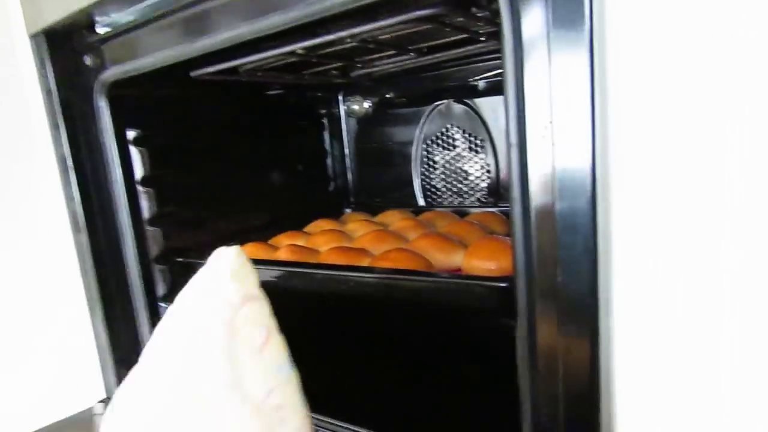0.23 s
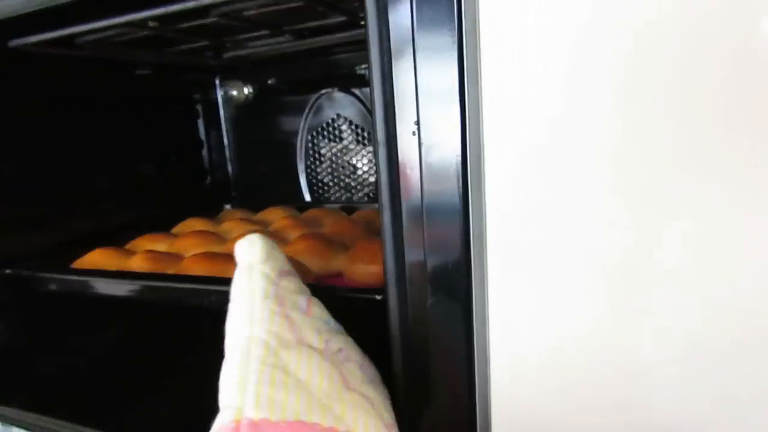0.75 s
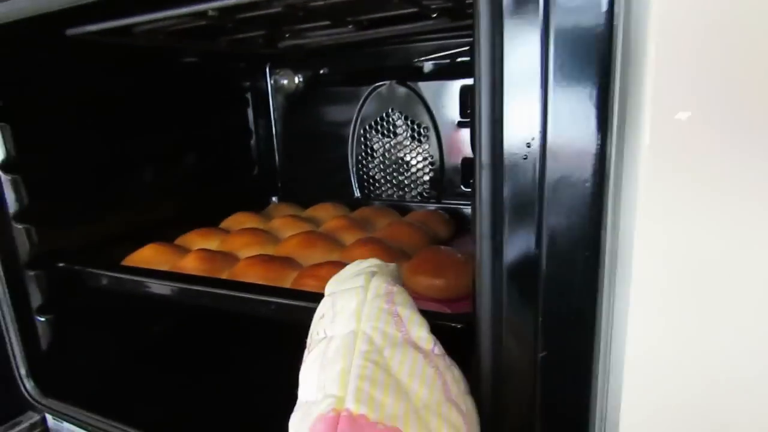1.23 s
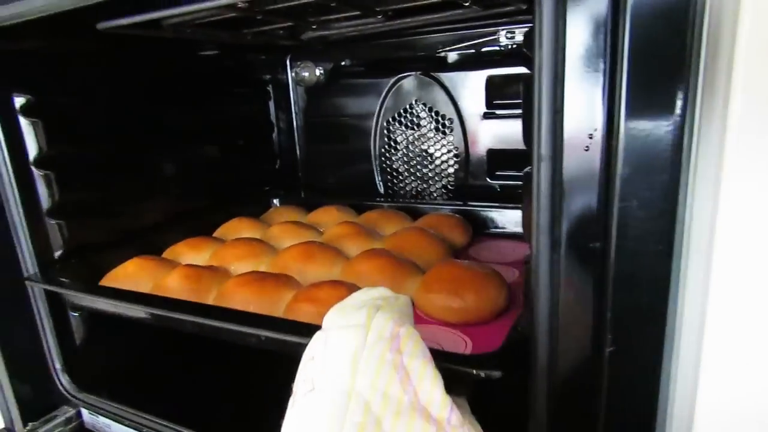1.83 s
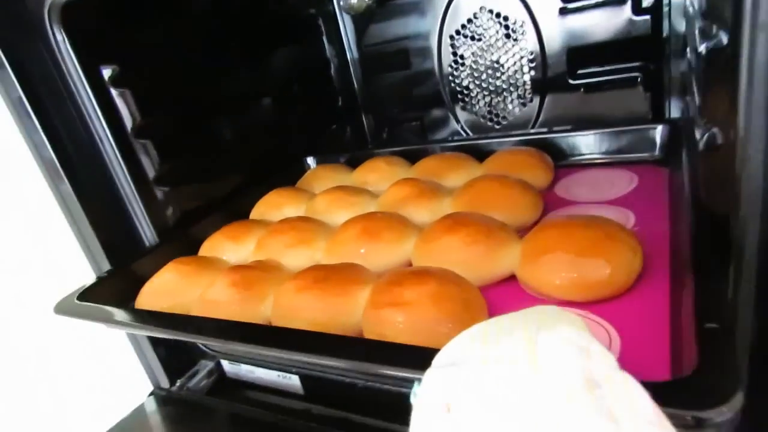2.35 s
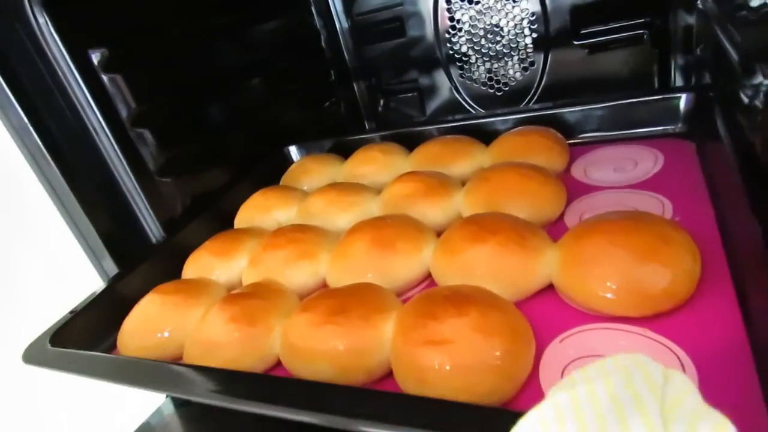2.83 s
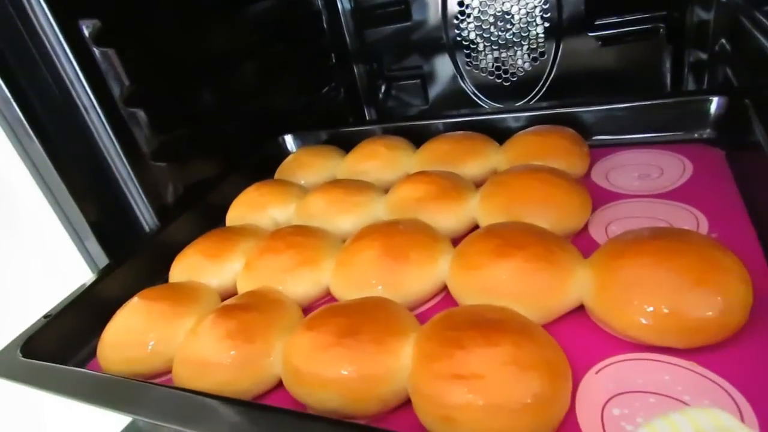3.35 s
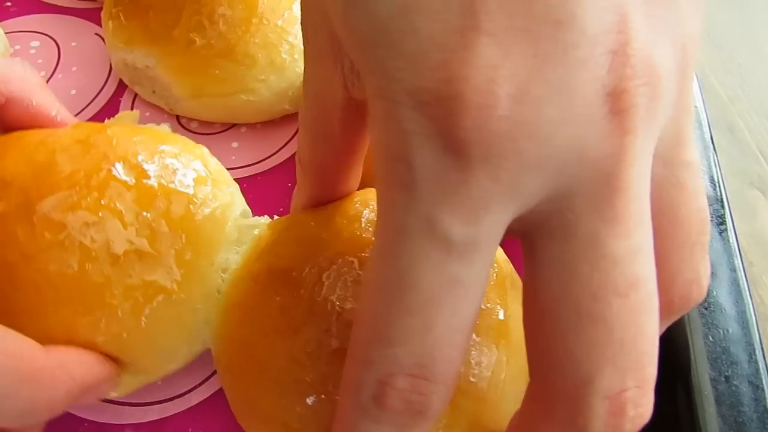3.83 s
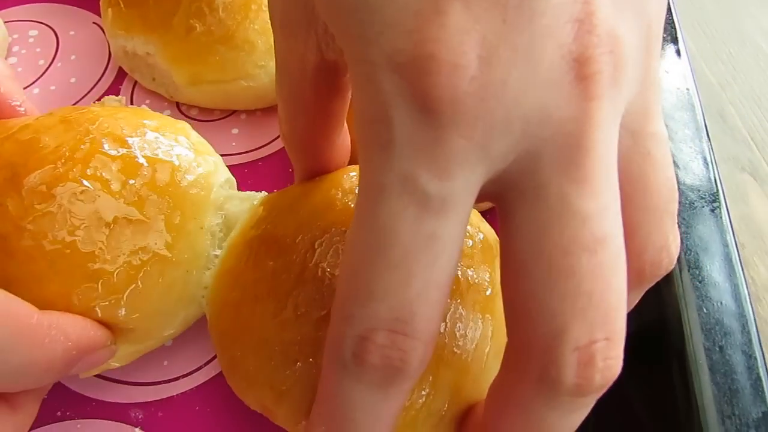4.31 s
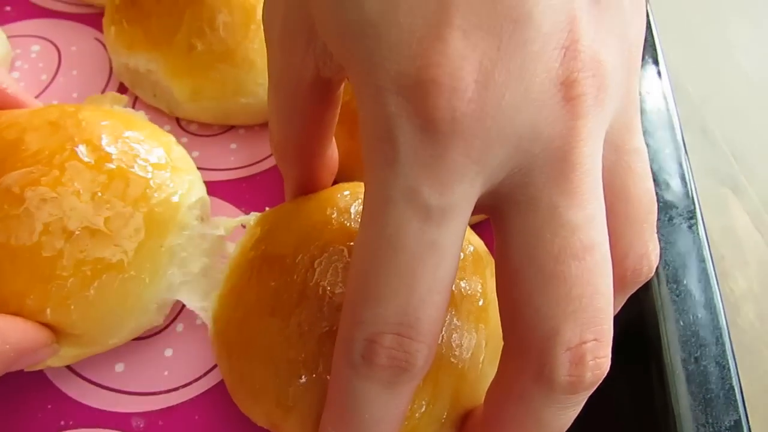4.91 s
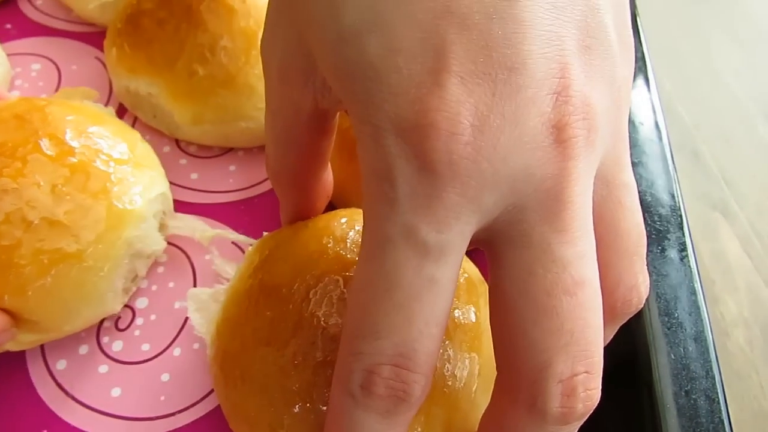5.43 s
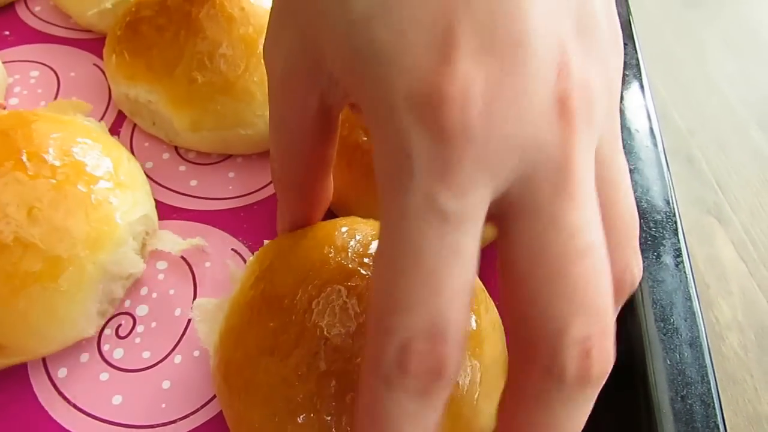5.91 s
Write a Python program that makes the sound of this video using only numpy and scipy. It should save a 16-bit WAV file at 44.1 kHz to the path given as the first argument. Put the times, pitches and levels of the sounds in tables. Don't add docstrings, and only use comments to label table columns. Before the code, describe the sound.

A metal baking tray is bumped, scraped out along oven rails and knocks to a stop amid hot steel ticks, then birds chirp faintly outside.

```python
import sys
import numpy as np
from scipy import signal
from scipy.fft import rfft, irfft, next_fast_len
from scipy.io import wavfile
from scipy.ndimage import map_coordinates

SR = 44100
rng = np.random.default_rng(int(sys.argv[2]) if len(sys.argv) > 2 else 0)


def materialize(psi):
    bounded = np.clip(np.atleast_2d(psi).T, -1, 1)
    quanta = np.round(bounded * 32767).astype(np.int16)
    wavfile.write(sys.argv[1], SR, quanta)


def magnitude_from_level(level_db):
    exponent = np.asarray(level_db, float) / 20
    return 10 ** exponent


N = 272097
CUT_S = 3.675


def unit(x):
    return x / np.sqrt(np.mean(x ** 2) + 1e-20)


def along(points, hz):
    f, v = np.transpose(points)
    return np.interp(np.log(hz + 1), np.log(f + 1), v)


def curves(rows):
    s, *cols = np.transpose(rows)
    return [np.interp(np.arange(N) / SR, s, c) for c in cols]


def during(t0, t1, fade):
    t = np.arange(N) / SR
    return np.clip((t - t0) / fade, 0, 1) * np.clip((t1 - t) / fade, 0, 1)


def wobble(rate, size=N):
    knots = rng.standard_normal(int(size * rate / SR) + 4)
    return map_coordinates(knots, [np.arange(size) * rate / SR])


def filtered(x, response):
    m = next_fast_len(x.shape[-1] + 4096)
    return irfft(rfft(x, m) * response(np.fft.rfftfreq(m, 1 / SR)), m)[..., :x.shape[-1]]


def coloured(points):
    return lambda hz: magnitude_from_level(along(points, hz))


def peaks(modes):
    def response(f):
        total = 0
        for k, (centre, width, db) in enumerate(modes):
            damping = 1j * f * width
            total = total + (-1) ** k * magnitude_from_level(db) * damping / (centre ** 2 - f * f + damping)
        return total
    return response


def pair(colour, side_db, size=N):
    def split(hz):
        turn = np.arctan(magnitude_from_level(along(side_db, hz)))
        return colour(hz) * [np.cos(turn), np.sin(turn)]
    mid, side = filtered(rng.standard_normal((2, size)), split)
    return unit(np.array([mid + side, mid - side]))


def dying(t60_of, width, size):
    hz, t, z = signal.stft(pair(np.ones_like, width, size=size), SR, nperseg=128)
    decay = magnitude_from_level(-60 * t / t60_of(hz)[:, None])
    return signal.istft(z * decay, SR, nperseg=128)[1][:, :size]


def add(track, s, sound):
    part = track[:, round(s * SR):][:, :sound.shape[1]]
    part += sound[:, :part.shape[1]]


# f/Hz, level/dB per Hz
QUIET = [(8.8, -30), (15, 4.5), (40, -11), (118, -20), (274, -34.5), (519, -35.5), (618, -36.5),
         (1440, -43), (2290, -39.5), (2490, -36.5), (2720, -45.5), (3750, -41), (6320, -49), (9220, -48.5),
         (15600, -53)]
# f/Hz, side minus mid level/dB
QUIET_ALIKE = [(60, -11), (130, -1.5), (290, -2), (640, 0.5), (1410, 1), (3100, 2.5), (6820, 0.5),
               (15000, -20)]


def kitchen():
    return magnitude_from_level(-60) * pair(coloured(QUIET), QUIET_ALIKE)


# t/s, level/dB
LOW_FLOCK = [(3.659, -78), (4.1, -91), (4.6, -96.5), (5.8, -86), (6.17, -88.5)]
# t/s, level/dB
HIGH_FLOCK = [(4.55, -100), (4.8, -88.5), (5.7, -91), (6.17, -101)]


def flock():
    out = np.zeros(N)
    ranges_hz = ([2100, 2500, 3100, 3500, 3900, 4300], [6500, 7100, 7700])
    for db, centres_hz in zip(curves(LOW_FLOCK) + curves(HIGH_FLOCK), ranges_hz):
        for hz in centres_hz:
            pitch = hz * (1 + .05 * wobble(25) + .02 * wobble(120))
            tone = np.sin(2 * np.pi * np.cumsum(pitch) / SR)
            out += magnitude_from_level(db) * unit(magnitude_from_level(5 * wobble(22))) * tone
    return out


# t/s, length/s, starting f/Hz, level/dB
CHIRPS = [(3.68, .05, 3300, -82), (3.92, .08, 4700, -75), (4.22, .04, 4300, -79), (4.25, .03, 3350, -79),
          (4.44, .04, 4450, -78), (4.46, .03, 3350, -78), (5.28, .05, 3150, -78), (5.4, .06, 3700, -75),
          (5.53, .05, 3800, -79), (5.58, .03, 3150, -79), (5.67, .06, 3700, -76), (5.9, .04, 4400, -84)]
WHISTLES = [(3.8, .2, 1890, -84), (4.0, .155, 2280, -73), (4.34, .07, 1690, -85), (4.76, .19, 1880, -79),
            (4.79, .2, 4030, -83), (4.96, .13, 3990, -76), (5.09, .14, 4000, -82), (5.93, .14, 3200, -86),
            (5.33, .13, 2630, -76), (5.96, .16, 2070, -84)]
WARBLES = [(3.66, .13, 2040, -76), (3.66, .08, 4400, -80), (3.72, .08, 3960, -75), (4.47, .15, 1970, -73),
           (5.07, .2, 2040, -77), (5.25, .12, 2160, -82), (5.24, .07, 3620, -81), (5.63, .25, 2020, -83)]
RISERS = [(4.42, .08, 1780, -83), (5.02, .06, 6600, -85), (5.42, .07, 5080, -82), (5.47, .06, 6750, -89),
          (5.87, .08, 2100, -82), (6.04, .06, 5180, -88)]
COOS = [(3.9, .65, 490, -83), (5.93, .24, 545, -85)]
HOOT = [(5.44, .14, 725, -71)]
STROKES = [(s + lag, .9 * length, hz, db + 1) for s, length, hz, db in CHIRPS for lag in (0, .022)]
# notes, glide/(share of pitch per s), smear f/Hz
SINGERS = [(STROKES, -5.5, 110), (WHISTLES, -.07, 14), (WARBLES, -.12, 70),
           (RISERS, .7, 110), (COOS, .01, 16), (HOOT, -.6, 3)]
# f/Hz, time to fall 60 dB/s
YARD = [(300, 0.41), (8000, 0.2)]


def birds():
    dry = flock()[None]
    for notes, glide, smear_hz in SINGERS:
        for s, length, hz, db in notes:
            u = np.linspace(0, 1, round(length * SR))
            pitch = hz * (1 + glide * length * u ** .7) + smear_hz * wobble(130, size=len(u))
            swell = np.clip(np.minimum(u, 1 - u) * length / 0.012, 0, 1)
            swell = swell * magnitude_from_level(1.3 * wobble(14, size=len(u)) - 4.3 * u)
            note = swell * np.sin(2 * np.pi * np.cumsum(pitch) / SR)
            add(dry, s, magnitude_from_level(db + 6.5) * note[None])
    hz, t, z = signal.stft(rng.standard_normal((2, SR // 2)), SR, nperseg=256)
    tail = signal.istft(z * magnitude_from_level(-60 * t / along(YARD, hz)[:, None]), SR, nperseg=256)[1]
    echoes = signal.fftconvolve(dry, tail / np.linalg.norm(tail[0]), axes=1)[:, :N]
    return magnitude_from_level(-5.5) * dry + magnitude_from_level(-2.5) * echoes


# t/s, level/dB
OVEN_AIR = [(0.0, -50.5), (1.4, -50.5), (1.72, -44.5), (2.08, -53), (2.4, -47.5), (2.93, -48),
            (3.51, -55.5), (3.67, -49.5)]
# f/Hz, level/dB per Hz
AIR = [(180, -31.5), (300, 3), (360, -2.5), (468, 0), (937, -8), (1030, 2), (1140, -15.5), (1850, -12.5),
       (2050, -10), (2250, -14), (2650, -15.5), (11100, -32.5), (15500, -36.5)]
# f/Hz, level/dB per Hz
DRONE = [(29, -44.5), (50, -15), (104, -0.5), (151, 4), (298, -4), (330, -14), (430, -39.5), (730, -120)]
# f/Hz, side minus mid level/dB
OVEN_ALIKE = [(60, -10.5), (130, -17), (290, 1.5), (640, -0.5), (1410, -8), (3100, -7.5), (6820, -8),
              (15000, -0.5)]


def air():
    air_db, = curves(OVEN_AIR)
    drone_db = -56.5 + 9 * during(1.0, 3.47, 0.17)
    rush = magnitude_from_level(air_db + 2.9 * wobble(30)) * pair(coloured(AIR), OVEN_ALIKE)
    drone = magnitude_from_level(drone_db + wobble(4.2)) * pair(coloured(DRONE), OVEN_ALIKE)
    return rush + drone


# t/s, f/Hz, level/dB
SQUEAK_HIGH = [(.01, 5080, -51), (.1, 5300, -56), (.14, 5480, -61), (.165, 5850, -63), (.21, 5750, -61),
               (.216, 6300, -62), (.25, 6400, -71), (.31, 6720, -62), (.36, 6200, -70), (.4, 6650, -66),
               (.44, 6700, -75)]
SQUEAK_LOW = [(0.885, 3050, -66), (.905, 3200, -56), (0.928, 3350, -52), (.95, 3440, -57),
              (.972, 3560, -66), (.985, 3650, -56), (1.005, 3745, -57), (1.035, 3760, -56),
              (1.088, 3660, -58)]


def squeaks():
    out = np.zeros(N)
    for rows in (SQUEAK_HIGH, SQUEAK_LOW):
        hz, db = curves(rows)
        pitch = hz + 40 * (hz / 4500) ** 2 * wobble(120)
        tone = np.sqrt(2) * np.sin(2 * np.pi * np.cumsum(pitch) / SR)
        level = magnitude_from_level(db - 2.5 + 3.5 * wobble(70))
        out += during(rows[0][0] - .01, rows[-1][0], .01) * level * tone
    return out


# t/s, peak level/dB, panel ring level/dB, time to fall 60 dB/s,
# panel f/Hz, tilt/dB per octave
TICKS = [(0.111, -37, -15, 0.26, 1950, -1.5), (0.200, -44.5, -9, 0.35, 2020, -1),
         (0.294, -36.5, -6, 0.22, 1895, 2.5), (0.390, -36.5, -5.5, 0.35, 1550, 0),
         (0.505, -38, -7, 0.23, 2130, -2), (0.621, -32, -4.5, 0.21, 1430, 1.5),
         (0.698, -29, -11, 0.29, 1980, -0.5), (0.797, -39, -1.5, 0.16, 1800, 0.5),
         (0.846, -35, -5.5, 0.22, 1785, 3), (1.007, -43, -4, 0.22, 2075, 0.5),
         (1.088, -34, -8.5, .1, 1200, -2), (1.307, -36.5, -6, 0.18, 2140, 3.5),
         (1.408, -42, -4.5, 0.29, 1740, 1), (1.482, -49, -12, .2, 1650, -4),
         (1.808, -39, -2.5, 0.24, 2020, 1.5), (2.207, -31, 1.5, 0.16, 2010, -1.5),
         (2.568, -32, 6.5, 0.18, 2075, 2.5), (2.647, -34.5, -1.5, 0.21, 2200, 0),
         (2.794, -36.5, -22, 0.14, 2080, -0.5), (2.860, -33.5, -3, 0.22, 1420, 0.5),
         (2.918, -24.5, 1, 0.2, 2074, -4), (3.161, -44, -20, 0.26, 1200, 0),
         (3.176, -36.5, -12, 0.27, 2140, -3.5), (3.189, -30, 2, 0.18, 2060, -2.5),
         (3.286, -29, -8.5, 0.25, 2080, -2), (3.514, -37, -1, 0.2, 2050, -1.5),
         (3.532, -40.5, -0.5, 0.35, 1640, 2), (3.6, -32.5, -5, 0.15, 2110, 4),
         (3.647, -43.5, -14, 0.31, 2070, -1)]
# f/Hz, level/dB per Hz
TICK_COLOUR = [(710, -37), (1200, -7.5), (1750, -9), (2090, -4), (2210, -13.5), (2680, -14), (5040, -12),
               (7090, -15.5), (11400, -14), (13300, -17), (14500, -22.5), (15500, -36.5)]
# f/share of its pitch, width/share of its pitch, level/dB
PANEL_RING = [(.88, 0.028, -9.5), (1, 0.016, 4.5), (1.1, .05, -13.5), (1.2, 0.035, -7.5)]
# f/Hz, width/Hz, level/dB
RACKS = [(2870, 70, 2), (3700, 80, 4), (4260, 90, 6), (5100, 90, 3), (6500, 110, 3), (7500, 120, 6),
         (8650, 130, 4), (9800, 130, 10), (10600, 120, 2), (11200, 140, 6), (12550, 130, 4),
         (13400, 170, 5), (14200, 170, 3)]
# t/s, level/dB, f/Hz
DRUMS = [(.296, -43.5, 740), (.392, -43.5, 735), (.41, -47, 202), (.506, -57, 780), (.622, -46.5, 170),
         (.64, -43.5, 656), (.7, -41.5, 814), (.7, -48.5, 430), (.85, -48.5, 705), (1.31, -49.5, 783),
         (2.57, -43, 643), (2.863, -38, 645), (2.921, -37, 650), (3.191, -42, 710), (3.289, -38.5, 670),
         (3.516, -46.5, 630), (3.601, -44.5, 680)]
# f/Hz, side minus mid level/dB
TRAY_ALIKE = [(60, -19.5), (130, -32.5), (290, -18.5), (640, -23), (1410, -20), (3100, -13), (6820, -12),
              (15000, -2)]


def ticks():
    out, size = np.zeros((2, N)), SR // 3
    t = np.arange(size) / SR
    rise = 1 - np.exp(-(t / .0045) ** 2)
    for s, db, ring_db, t60, panel_hz, tilt_db in TICKS:
        burst = rise * dying(lambda hz: t60 * (2000 / (hz + 300)) ** 0.17, OVEN_ALIKE, size=size)
        burst = burst * magnitude_from_level(1.5 * wobble(200, size=size))
        scatter = rng.standard_normal((len(RACKS), 2))
        racks = peaks([(hz * (1 + 0.0086 * d), width, level + 1 + 3 * e)
                       for (hz, width, level), (d, e) in zip(RACKS, scatter)])
        ring = peaks([(share * panel_hz, w * panel_hz, level) for share, w, level in PANEL_RING])

        def colour(hz):
            box = magnitude_from_level(along(TICK_COLOUR, hz) + tilt_db * np.log2((hz + 1) / 4000))
            return box * (1 + racks(hz)) + magnitude_from_level(ring_db + 10.5) * ring(hz)
        add(out, s - .002, magnitude_from_level(db + 3.5) * filtered(burst, colour))
    for s, db, hz in DRUMS:
        drum = filtered(pair(np.ones_like, TRAY_ALIKE, size=size), peaks([(hz, 0.14 * hz, 0)]))
        add(out, s, magnitude_from_level(db - 60 * t / 0.27) * rise * unit(drum))
    return out


# f/Hz, width/Hz, level/dB
SHEET = [(116.8, 49, -2), (233.6, 49, 14), (449.5, 15, 12), (628, 40, -1), (878, 29, -1.5), (1420, 35, -4),
         (2030, 270, -2.5)]
JOLT_RISE_S, JOLT_FALL_S, JOLT_SPREAD_DB = 0.017, 0.04, 12


def shaking(effort, parts, jolts):
    t = np.arange(N) / SR
    effort_db, = curves(effort)
    top_db = effort_db.max()
    since_start = np.clip(t - effort[0][0], 0, 2)
    power = np.array([magnitude_from_level(top_db + db + swing * (effort_db - top_db) + grows * since_start) ** 2
                      for db, grows, swing in parts])
    for s, db, part in jolts:
        swell = np.exp(-2 * np.maximum((s - t) / JOLT_RISE_S, (t - s) / JOLT_FALL_S))
        reach_db = db - JOLT_SPREAD_DB * np.abs(np.arange(4) - part)
        power = power + magnitude_from_level(reach_db)[:, None] ** 2 * swell
    return np.sqrt(power)


def rub(rows, parts, jolts, colour, grit_db, modes_db):
    out = np.zeros((2, N))
    grains = magnitude_from_level(grit_db * (0.88 * wobble(45) + wobble(300))) * pair(np.ones_like, TRAY_ALIKE)
    crowd_db = modes_db * rng.standard_normal(600) * np.clip(np.arange(600) / 25, 0, 1)

    def body(hz):
        crowd = magnitude_from_level(np.interp(hz, 40 * np.arange(600), crowd_db))
        return magnitude_from_level(along(colour, hz)) * (1 + np.abs(peaks(SHEET)(hz))) * crowd

    edges_hz = [50, 330, 1700, 5200, 15500]
    for lo, hi, gain in zip(edges_hz, edges_hz[1:], shaking(rows, parts, jolts)):
        band = lambda hz: body(hz) / np.sqrt((1 + (lo / (hz + 1)) ** 8) * (1 + (hz / hi) ** 8))
        out += gain * unit(filtered(grains, band))
    return out * during(rows[0][0] - .04, rows[-1][0] + 0.054, 0.026)


# t/s, level/dB
DOOR = [
    (0.0, -39),
    (0.03, -45),
    (0.09, -51.5),
    (0.14, -62),
    (0.2, -78),
]
# level/dB over the effort, growth/dB per s, swing/share of the effort's
DOOR_PARTS = [
    (-9.5, 40, 0.8),
    (1, 18, 1.2),
    (-1.5, .1, 1.1),
    (-11.5, 20, 0.92),
]
# f/Hz, level/dB per Hz
DOOR_COLOUR = [(24, -40), (40, 4.5), (75, 17), (359, -21.5), (637, -6), (1520, -16.5), (3300, -2),
               (5170, -16), (6160, -26.5), (15500, -59)]


def door():
    return rub(DOOR, DOOR_PARTS, [], DOOR_COLOUR, grit_db=-0.2, modes_db=2.0)


# t/s, level/dB
DRAG = [(1.33, -60), (1.385, -83), (1.42, -57), (1.6, -44), (1.78, -43), (2.06, -48), (2.4, -42.5),
        (2.6, -52), (2.7, -63.5)]
# level/dB over the pull, growth/dB per s as it overhangs, swing/share of the pull's
DRAG_PARTS = [
    (-5.5, 9, 0.84),
    (0.5, 8, 0.8),
    (-0.5, -5, 0.86),
    (-12, 3, 2),
]
# t/s, level/dB, part shaken most/(0 boom to 3 hiss)
JOLTS = [(1.33, -51.5, .05), (1.448, -35.5, 0.033), (1.5, -47.5, 2.9), (1.548, -21.5, 0.011),
         (1.6, -41.5, 1.8), (1.66, -42, 1.9), (1.697, -36, 1.3), (1.71, -31, .5), (1.725, -42.5, 2.9),
         (1.822, -26, 1.12), (1.915, -23, 0.41), (1.93, -39, 1.52), (1.948, -40, 0.81), (1.995, -37, 0.73),
         (2.155, -38, 0.73), (2.39, -46, 2.1), (2.49, -38.5, 1.66), (2.05, -36.5, 0.033), (2.3, -38, 1.1),
         (2.435, -25.5, 0.31), (2.58, -47, 2.87), (2.618, -53, 0.26), (2.664, -50, 2.1),
         (2.699, -37.5, 0.43)]
# f/Hz, level/dB per Hz
DRAG_COLOUR = [(40, -30), (100, 9.5), (220, -6), (340, -13), (470, -5), (750, -2.5), (1000, -6),
               (1400, -9.5), (2000, -13.5), (2700, -15.5), (3800, -20.5), (5000, -31), (7000, -38.5),
               (12800, -38), (15500, -45.5)]


def drag():
    return rub(DRAG, DRAG_PARTS, JOLTS, DRAG_COLOUR, grit_db=1.26, modes_db=3.5)


# t/s, ring level/dB, clatter level/dB, clatter's time to fall 60 dB/s, rise/s
KNOCKS = [
    (1.092, -7, -20, 0.45, 0.002),
    (2.7163, -10, -22.5, 0.33, 0.0016),
]
# f/Hz, level/dB, time to fall 60 dB/s (played as .33 at most)
BUMP = [(129, -12.5, 0.1802), (152.6, -11, 0.4), (184, -4, 0.1636), (205, -1.5, .05), (216, -2, 0.26),
        (316.4, -18, 0.5), (374, -16.5, 0.4), (482.5, -16, 0.247), (600, -19, 0.24), (691.5, -10.5, 0.11),
        (886.4, -16, .4), (1187, -25.5, 0.195), (1930, -28, .2), (2346, -28.5, 0.22)]
STOP = [(188.7, 0.5, 0.09), (265.6, -17.5, 0.092), (406, -13, 0.15), (576, -18, .1), (727, -18.5, 0.11),
        (890, -21, .15), (1150, -31, 0.19), (1725, -25.5, .1), (2060, -29, .2)]
# f/Hz, level/dB per Hz
BUMP_CLATTER = [(41, -52.5), (70, -22.5), (227, -14.5), (284, -9.5), (686, -21), (751, -23.5), (899, -13.5),
                (1100, -35.5), (1180, -16.5), (1290, -29), (1940, -26), (11300, -48.5), (15500, -63)]
STOP_CLATTER = [(41, -42), (70, -9), (189, -2), (340, -15.5), (417, -11), (655, -14.5), (734, -15.5),
                (1050, -29), (1620, -27), (3260, -28), (5480, -41), (12400, -40.5), (15500, -63)]
# f/Hz, level/dB per Hz
CRACK = [(100, -27.5), (500, -6), (1000, 4), (1800, 11.5), (3000, 0.5), (4400, -9.5), (5400, -22),
         (15000, -31.5)]


def knocks():
    out, size = np.zeros((2, N)), SR // 2
    t = np.arange(size) / SR
    blows = zip(KNOCKS, (BUMP, STOP), (BUMP_CLATTER, STOP_CLATTER))
    for (s, ring_db, clatter_db, t60, rise), modes, colour in blows:
        ring = np.zeros(size)
        for k, (hz, db, mode_t60) in enumerate(modes):
            sign = (-1) ** (k * (hz > 250))
            ring += sign * magnitude_from_level(db - 60 * t / min(mode_t60, .33)) * np.sin(2 * np.pi * hz * t)
        burst = dying(lambda hz: t60 * (1000 / (hz + 300)) ** 0.31, TRAY_ALIKE, size=size)
        clatter = filtered(burst, coloured(colour))
        clatter = clatter / np.sqrt(np.mean(clatter[:, :SR // 40] ** 2))
        crack = (1 - np.exp(-t / rise)) * magnitude_from_level(-60 * t / 0.028)
        crack = crack * pair(coloured(CRACK), TRAY_ALIKE, size=size)
        crack_gain = magnitude_from_level(-18.5) * 0.003 / rise
        blow = (magnitude_from_level(ring_db) * ring + magnitude_from_level(clatter_db) * clatter) * (1 - np.exp(-(t / rise) ** 2))
        add(out, s, blow + crack_gain * crack)
    return filtered(out, lambda hz: (1j * hz / (75 + 1j * hz)) ** 2)


def scene():
    oven = air() + squeaks() + ticks() + door() + drag() + knocks()
    outside = birds() * during(CUT_S - .01, 9, 0.0066)
    return kitchen() + outside + oven * during(-1, CUT_S, 0.0039)


def band_limit(x):
    return signal.sosfilt(signal.butter(12, 15300, fs=SR, output="sos"), x)


def record(dry):
    mix = filtered(dry, lambda hz: 1 / (1 + (hz / 15600) ** 60))
    return band_limit(mix)


dry = scene()
out = record(dry)
materialize(out)
```